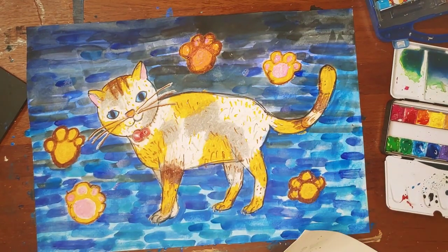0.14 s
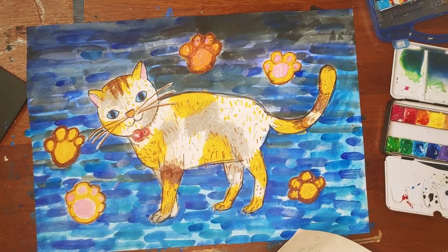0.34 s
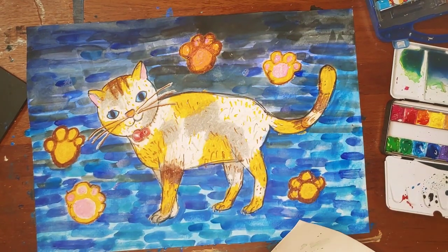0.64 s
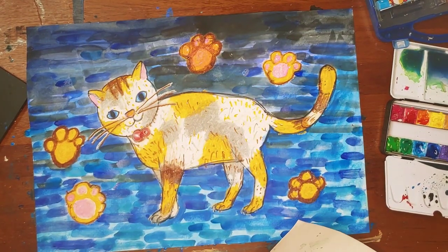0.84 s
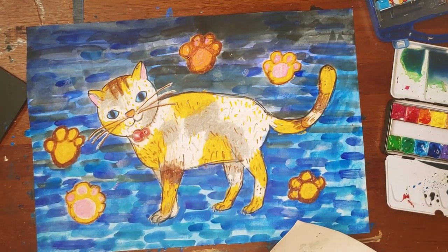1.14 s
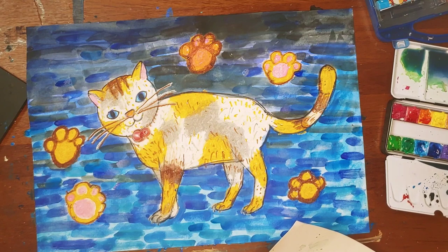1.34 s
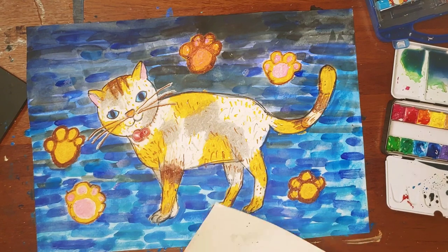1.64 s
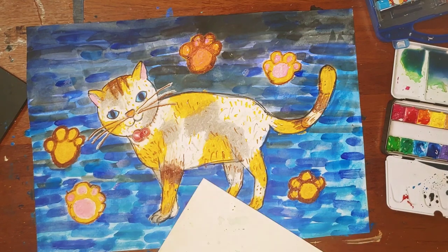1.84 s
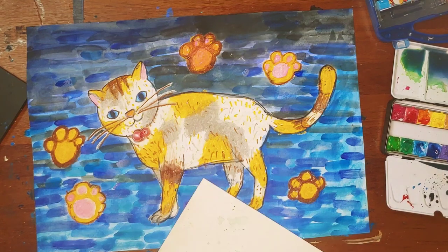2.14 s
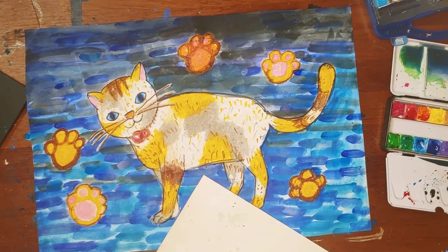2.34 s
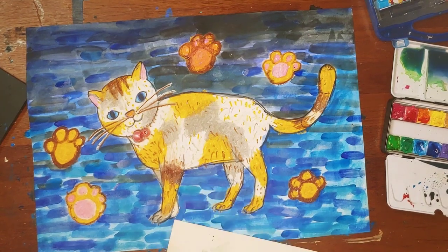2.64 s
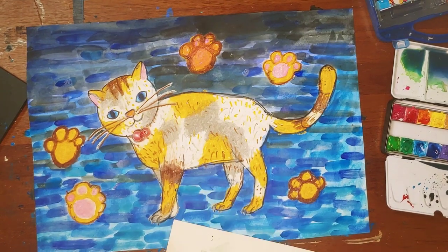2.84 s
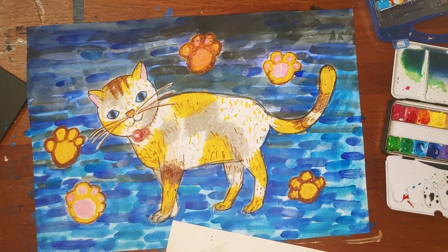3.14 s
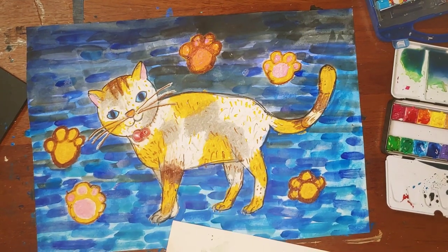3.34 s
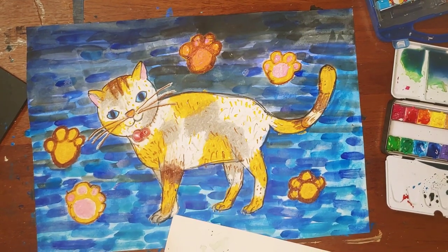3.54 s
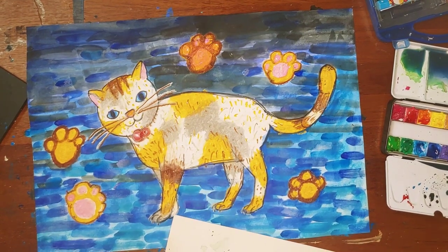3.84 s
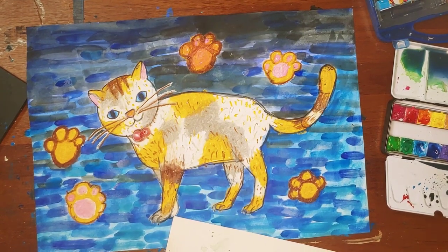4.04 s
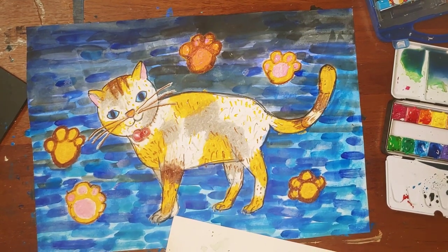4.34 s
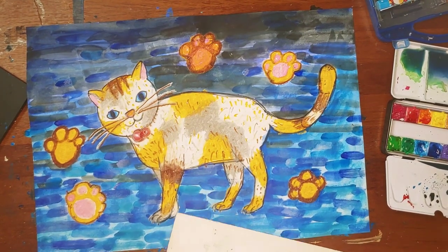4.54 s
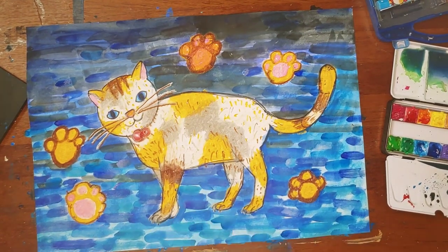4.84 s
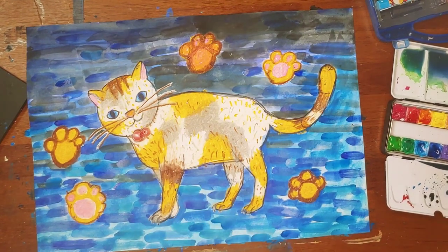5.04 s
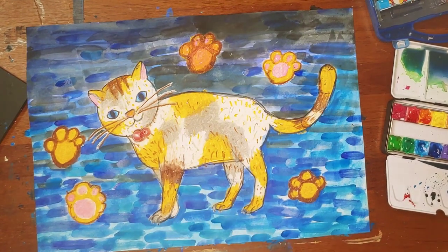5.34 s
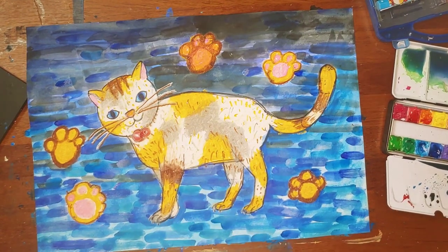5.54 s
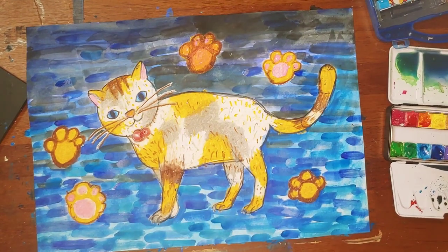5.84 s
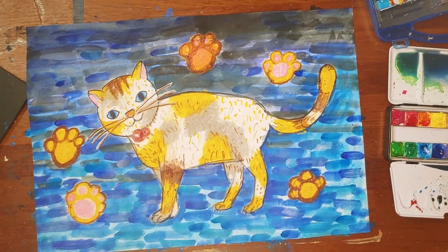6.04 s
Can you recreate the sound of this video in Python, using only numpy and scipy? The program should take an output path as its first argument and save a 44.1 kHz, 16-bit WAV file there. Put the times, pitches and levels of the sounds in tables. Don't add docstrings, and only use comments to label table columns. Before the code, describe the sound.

Close stereo microphones on a desk stand, in a quiet room with low hum and very faint hiss. At 0 s a low bump and bright, dry paper scuffs start, hissing in quick bursts until about 0.3 s, with soft low bumps continuing to 0.8 s. Near 1.1 s a light edge slap and tick; from 1.4 to 2.1 s short dull rubs, woody taps, muffled thumps and squeaky hisses. At 2.3 s one hard, hollow knock on wood, far louder than the rest, with an immediate slap and another thump and tap. At 2.5-2.8 s a soft pop, crease ticks, taps and scuffs. Around 3.3 s a slower pop, then small rubs and flicks to 3.7 s. At 4.05 s a firm woody slap, a shorter one at 4.4 s, a soft thump at 4.55 s. Sparse ticks and faint taps follow, ending with a dull slap at 5.7 s and room tone.

```python
import sys
import numpy as np
from scipy import signal
from scipy.io import wavfile
from scipy.ndimage import uniform_filter1d

SR = 44100
rng = np.random.default_rng(int(sys.argv[2]) if len(sys.argv) > 2 else 0)


def magnitude_from_level(level_db):
    exponent = np.asarray(level_db, float) / 20
    return 10 ** exponent


def transcribe(signal):
    frames = np.atleast_2d(signal).T
    limited = np.clip(frames, -1, 1)
    pcm = np.round(limited * 32767).astype(np.int16)
    wavfile.write(sys.argv[1], SR, pcm)


N = 272979


def rms_one(x):
    return x / np.sqrt(np.mean(x ** 2) + 1e-20)


def at_hz(points, hz):
    table_hz, value = np.array(points).T[:2]
    return np.interp(np.log(hz), np.log(table_hz), value)


def band(x, low_hz, high_hz, order=2):
    return signal.sosfilt(signal.butter(order, [low_hz, high_hz], "band", fs=SR, output="sos"), x)


def drift(rate_hz):
    r = np.exp(-40 * np.pi * rate_hz / SR)
    chance = rng.standard_normal(N // 20 + 2002)
    slow = signal.lfilter([1], [1, -2 * r, r * r], chance)[2000:]
    return np.interp(np.arange(N) / 20, np.arange(len(slow)), rms_one(slow))


def ring(force, hz, t60_s):
    r = magnitude_from_level(-60 / (t60_s * SR))
    w = 2 * np.pi * hz / SR
    return signal.lfilter([0, np.sin(w)], [1, -2 * r * np.cos(w), r * r], force + 1e-18)


def two_ports(mid, side, alike):
    alike = np.clip(alike, -.95, .999)
    return np.sqrt(1 + alike) * mid + np.sqrt(1 - alike) * side * [[1], [-1]]


# pitch_hz, density_db (per Hz)
ROOM_SPECTRUM = [(18, -32), (32, -2), (52, -1.5), (82, -8), (158, -3), (287, -12), (358, -13), (736, -15),
                 (2040, -30.5), (3690, -34), (4280, -38.5), (4970, -38.5), (6690, -42.5), (7390, -49),
                 (9470, -28), (11300, -48.5), (14700, -80), (22000, -120)]
# pitch_hz, likeness (-1 to 1)
PORT_LIKENESS = [(60, 0.9), (130, 0.88), (260, 0.82), (560, 0.49), (1170, -0.085), (2450, -0.2),
                 (5150, 0.03), (10800, -0.089)]


def room_tone():
    out = 0
    together = drift(2.5)
    edges_hz = 28 * 2 ** np.arange(0, 9.4, .4)
    white = rng.standard_normal((2, 2, N))
    for k, (low, high) in enumerate(zip(edges_hz, edges_hz[1:])):
        hz = np.sqrt(low * high)
        pair = band(white[k % 2], low, high)
        level_db = at_hz(ROOM_SPECTRUM, hz) + .6 * together + .8 * drift(9)
        out = out + magnitude_from_level(level_db) * two_ports(*pair, at_hz(PORT_LIKENESS, hz))
    return magnitude_from_level(-63.5) * rms_one(out)


# middle_s, level_db, length_s
STAND_BUMPS = [(-0.019, -31.5, 0.069), (0.098, -55, 0.18), (0.197, -56.5, 0.12), (0.299, -53, 0.12),
               (0.421, -56.5, 0.063), (0.498, -48, 0.09), (0.653, -58.5, 0.079), (0.757, -59, 0.075),
               (1.136, -62, 0.06), (1.23, -70, 0.053), (1.567, -63, 0.062), (1.718, -70, 0.31),
               (1.945, -69, 0.11), (2.176, -64.5, 0.13), (2.58, -60, 0.31), (3.04, -72, 0.11),
               (3.47, -59.5, 0.067), (3.819, -67.5, 0.11), (4.432, -75, 0.35), (5.142, -64.5, 0.077),
               (5.417, -67, 0.065), (5.517, -77, 0.043), (5.79, -61, 0.091), (6.01, -78, 0.088)]


def bumps():
    time = np.arange(N) / SR
    level = magnitude_from_level(-73.5)
    for middle_s, db, length_s in STAND_BUMPS:
        swell = np.cos(np.pi * np.clip((time - middle_s) / length_s, -.5, .5)) ** 2
        level = level + magnitude_from_level(db) * swell
    shake = band(rng.standard_normal((2, N)), 42, 85)
    shake = shake / uniform_filter1d(np.abs(shake[0]), size=1300)
    return level * rms_one(two_ports(*shake, 0.99))


# start_s, peak_db, pulse_ms, crack_db
SHEET_POPS = [
    (2.5262, -41, 1.8, -13),
    (3.3340, -38, 2.8, -17),
]


def pops():
    out, size = np.zeros((2, N)), 1500
    for s, db, pulse_ms, crack_db in SHEET_POPS:
        age = np.arange(size) / SR / (pulse_ms / 1000) - .5
        crack = rng.standard_normal((2, size)) * np.exp(-np.clip(age, 0, 50) / .5) * (age > 0)
        crack = magnitude_from_level(crack_db) * signal.lfilter([.5], [1, -1.2, .36], crack)
        air = -(age + .07) * np.exp(-(age / .3) ** 2) * 8
        i = int(s * SR)
        out[:, i:i + size] += magnitude_from_level(db - 2) * (air + crack)
    return out


# start_s, peak_db, pitch_hz, t60_ms
CREASE_TICKS = [(1.135, -52.5, 4100, 7.3), (1.4548, -59, 1090, 27), (1.455, -51, 830, 40),
                (1.68, -54, 793, 69), (1.681, -44, 198, 70), (1.824, -52, 220, 64), (1.826, -49, 337, 50),
                (1.838, -55, 1400, 17), (2.4992, -59, 600, 12), (2.525, -51, 1346, 29),
                (2.561, -48.5, 640, 19), (2.564, -52, 205, 60), (2.569, -57, 940, 25),
                (2.577, -42.5, 697, 29), (2.95, -58.5, 2700, 15), (2.962, -64, 1834, 66),
                (2.986, -65, 3330, 13), (3.135, -68.5, 6720, 20), (3.135, -70, 9700, 15),
                (3.1795, -64.5, 3190, 7.1), (3.334, -50, 2010, 0.65), (3.684, -56, 1205, 38),
                (4.056, -57, 900, 25), (4.057, -54, 3600, 15), (4.058, -66, 4450, 15), (4.06, -59, 149, 80),
                (4.062, -54, 1190, 22), (4.065, -64, 3350, 25), (4.154, -74, 2530, 8.1),
                (4.2458, -70, 1400, 14), (4.387, -67, 2639, 3.8), (4.579, -68, 4270, 24),
                (4.8566, -69, 3190, 14), (5.05, -62.5, 3270, 13), (5.051, -66, 3780, 15),
                (5.053, -76, 6730, 49), (5.128, -78, 6600, 40), (5.4295, -62, 870, 15),
                (5.7, -62, 1370, 34), (5.699, -54, 540, 47), (5.701, -68, 3100, 22), (5.702, -72, 1970, 20),
                (5.702, -79, 4300, 50), (5.705, -61, 920, 36), (5.711, -53, 1500, 30)]


def ticks():
    out, size = np.zeros((2, N + SR)), 3000
    age = np.arange(size) / SR
    for s, db, hz, t60_ms in CREASE_TICKS:
        chance = rng.standard_normal((2, size))
        note = ring(chance * np.exp(-age / .004), hz, t60_ms / 1000)
        note = note / np.abs(note).max(axis=1, keepdims=True)
        click = magnitude_from_level(-13) * signal.lfilter([.35], [1, -1.5, .5625], chance * np.exp(-age / .001))
        i = int(s * SR)
        out[:, i:i + size] += magnitude_from_level(db) * two_ports(*(note + click), at_hz(PORT_LIKENESS, hz))
    return out[:, :N]


# start_s, peak_db, pitch_hz, contact_ms, snap_db
WOOD_TAPS = [(0.011, -53, 287, 14, -42), (0.269, -56.5, 414, 38, -12), (1.137, -54, 315, 5.4, -35),
             (1.452, -48, 378, 19, -36), (1.682, -42.5, 528, 20.2, -40), (1.825, -58, 330, 25, -4.5),
             (1.964, -53, 514, 17, -30), (2.3545, -31.5, 326, 8.9, -38), (2.498, -53.5, 467, 15, -22),
             (2.525, -45.5, 485, 9.7, -8.5), (2.56, -40, 440, 9, -37), (2.568, -36, 349, 14, -21),
             (2.654, -46, 494, 20, -37), (3.179, -63, 507, 17, -18), (3.315, -65, 298, 12, -26),
             (3.378, -49, 523, 16, -34), (3.563, -55, 478, 13, -15), (3.615, -53.5, 490, 7.9, -22),
             (4.052, -36, 501, 9.9, -43), (4.066, -46.5, 478, 12.4, -32), (5.31, -57, 390, 18, -30),
             (5.43, -58.5, 412, 6.5, -24), (5.7, -52, 334, 16, -44), (5.706, -51.5, 665, 7.2, -51)]


def taps():
    out, size = np.zeros((2, N + SR)), 4000
    age = np.arange(size) / SR
    for s, db, hz, contact_ms, snap_db in WOOD_TAPS:
        chance = rng.standard_normal((4, size))
        pan_db = -rng.uniform(-0.74, 1)
        contact_s = contact_ms / 1000
        force = 0.019 * chance[:2] * (age < contact_s)
        force[0, 0] = -1
        note = ring(force, hz, 95.0 / hz) + 1.8 * ring(force, hz * 1.18, 11.8 / hz)
        note = note + 0.086 * ring(force, hz * 2.3, 20.0 / hz) + 0.049 * ring(force, hz * 2.4, 42.0 / hz)
        note = note * np.minimum(age / 0.0053, 1) * np.exp(-np.maximum(age - contact_s, 0) / 0.0051)
        note = two_ports(*signal.lfilter([.3], [1, -.7], note), 0.57)
        snap = 0
        for mode_hz, width_hz, mode_db in SCRAPE_PEAKS[1:] + BRIGHT_PEAKS:
            snap = snap + magnitude_from_level(mode_db) * rms_one(ring(chance[2:], mode_hz, 6.9 / np.pi / width_hz))
        snap = magnitude_from_level(snap_db - 14.5) * snap * (np.exp(-age / 0.0068) + 0.235 * np.exp(-age / 0.011))
        tap = note / np.abs(note).max() + two_ports(*snap, -0.26)
        i = int(s * SR)
        out[:, i:i + size] += magnitude_from_level(db) * tap * magnitude_from_level(np.array([[pan_db], [-pan_db]]) / 2)
    return out[:, :N]


# start_s, peak_db, contact_ms, damped_after_ms
HAND_THUMPS = [(0.283, -52, 5.1, 27), (0.705, -54, 3.2, 49), (1.007, -59, 6.8, 10), (1.444, -47, 5.3, 31),
               (1.575, -53.5, 2.4, 35), (1.676, -41, 4, 58), (1.823, -44, 4, 22), (2.3435, -38, 4.2, 20),
               (2.3505, -29, 4.3, 27), (2.563, -42, 3, 40), (2.656, -41.5, 5.6, 82), (3.034, -58, 8.1, 17),
               (3.316, -50.5, 3.4, 37), (3.381, -50.5, 4.6, 42), (3.556, -58, 4, 26), (4.561, -45, 7.3, 42),
               (5.348, -51.5, 5.9, 11), (5.624, -46.5, 7.3, 51)]
# start_s, peak_db, contact_ms, damped_after_ms
KNOCK = [
    (2.2918, -12.3, 3.1, 36),
]
# pitch_hz, level_db, t60_s
DESK_MODES = [(82.5, -29.5, .1), (155.4, 0, .063), (220.7, -21, .105), (315, -15, .068)]
# pitch_hz, level_db, t60_s
STAND_MODES = [(149.4, 1.07, .054), (445, -13.5, .015)]
# pitch_hz, level_db, t60_s
PANEL_MODES = [(494, -29.5, 0.028), (715, -47.5, 0.11), (1016, -44, 0.088), (1257, -51, 0.051),
               (1920, -46, 0.04), (2780, -55, 0.08), (3800, -47.5, 0.03), (5400, -56, 0.034),
               (6570, -49, .03)]


def thumps():
    out, size = np.zeros(N + SR), 6000
    age = np.arange(size) / SR

    def modes(force, table):
        return sum(magnitude_from_level(db) * ring(force, hz, t60_s) for hz, db, t60_s in table)

    for s, db, contact_ms, damped_ms in HAND_THUMPS + KNOCK:
        push = np.hanning(max(3, int(abs(contact_ms) * SR / 1000)))
        force = np.pad(push / push.sum(), (0, size - len(push)))
        body = modes(force, STAND_MODES) - modes(force, DESK_MODES)
        body = body * np.minimum(age / .004, 1)
        edge = np.pad(np.hanning(10) / 5, (40, size - 50)) * min(3.1 / contact_ms, 1) ** 5
        body = body + modes(edge, PANEL_MODES)
        body = body * np.exp(-np.maximum(age - damped_ms / 1000, 0) / .012)
        i = int(s * SR)
        out[i:i + size] += magnitude_from_level(db) * body / np.abs(body).max()
    return out[:N]


def desk_at_ports(desk):
    later = np.pad(desk, (9, 0))[:N]
    sway = magnitude_from_level(-8.0) * band(desk, 45, 105) * [[1], [-1]]
    return np.array([magnitude_from_level(0.1) * later, magnitude_from_level(-0.7) * desk]) + sway


def friction(per_s, spread_db, grain_share):
    caught = rng.random((2, N)) < per_s / SR
    sizes = magnitude_from_level(spread_db * np.minimum(rng.exponential(1, N), 5)) * rng.standard_normal((2, N))
    return rng.standard_normal((2, N)) + grain_share * rms_one(caught * sizes)


def resonant(pair, peaks, alike):
    out = 0
    for k, (hz, width_hz, db) in enumerate(peaks):
        r = np.exp(-np.pi * width_hz / SR)
        poles = [1, -2 * r * np.cos(2 * np.pi * hz / SR), r * r]
        peak = signal.lfilter([(1 - r * r) / 2, 0, (r * r - 1) / 2], poles, pair)
        out = out + magnitude_from_level(db + 1.6 * drift(22)) * (-1) ** k * peak
    return rms_one(two_ports(*out, alike))


def ridge(s, hz, width_hz, alike):
    phase = 2 * np.pi * np.cumsum(np.interp(np.arange(N) / SR, s, hz)) / SR
    lowpass = signal.butter(2, width_hz / 2, fs=SR, output="sos")
    slow = signal.sosfilt(lowpass, rng.standard_normal((2, 2, N)))
    return rms_one(two_ports(*(slow[0] * np.cos(phase) + slow[1] * np.sin(phase)), alike))


# start_s, length_s, end_scrape_db, bright_share_db, rub_share_db
PAPER_SLIDES = [(0.006, 0.057, -59.5, 2, 3.5), (0.105, 0.063, -56.5, 3, -4.5), (0.265, 0.064, -64, 1.5, 3),
                (1.497, 0.11, -67.5, -11, 11), (1.639, 0.081, -67, -10, 5.5), (1.811, 0.032, -63, -3, 4),
                (1.952, 0.086, -59.5, -8, -2), (2.05, 0.023, -54, 3, -1.5), (2.515, 0.11, -67.5, 1, 6),
                (2.635, 0.13, -80, 5, 1), (2.648, 0.031, -72.5, -11, 20), (2.725, 0.083, -59.5, 0.5, -2.5),
                (2.801, 0.06, -76, -1.5, 8), (2.968, 0.042, -82, -3, 17), (3.478, 0.035, -80.5, -2, 9),
                (3.13, 0.038, -78, 0, 8.5), (3.344, 0.038, -74, -6, 6), (3.378, 0.036, -67, 0.5, 5.5),
                (3.444, 0.028, -61, -1, 2.5), (3.604, 0.018, -69, 1, 12), (3.641, 0.054, -67.5, 3.5, 12),
                (4.396, 0.018, -67.5, 2.5, 10.5), (3.985, 0.017, -72.5, -3.5, 10.5),
                (5.012, 0.02, -84.5, 7.5, -2), (4.564, 0.02, -72.5, 2.5, 8),
                (0.072, 0.046, -64.5, -1.5, -6)]
# peak_s, scrape_db, bright_share_db, rub_share_db, fade_ms (per 20 dB)
EDGE_FLICKS = [(0.28, -64.5, 13, 8, 5), (0.558, -72.5, -2, 12, 3), (1.036, -80, -2, 0, 29),
               (1.579, -65, -10, 8.5, 66), (1.69, -69, -13, -12, 32), (1.972, -62, 7, 9, 23),
               (2.322, -65.5, -14.5, 8.5, 38), (2.366, -65, -9, 16, 34.5), (2.807, -59, -3.5, -28, 36),
               (2.944, -69.5, -2, 11.5, 30), (3.272, -70.5, -12, 5, 28), (3.32, -64.5, -5, 7, 30),
               (3.572, -69.5, -5, 5, 33), (3.664, -52, -12, -10, 13), (1.535, -71, -12, 13, 30),
               (3.412, -68, 4, -22, 68), (0.191, -45, -1, -4.5, 12.5)]
# peak_s, scrape_db, bright_share_db, rub_share_db, fade_ms (per 20 dB)
EDGE_SLAPS = [
    (1.136, -59, -6.5, 1, 23),
    (2.2935, -52, -13.5, 14, 40.2),
    (4.054, -54, -9, 7.5, 39.7),
    (4.3845, -56, -10, -0.5, 24.8),
    (5.699, -76.5, -25, 22.5, 120),
]


def stroke_shapes(time):
    lift_db_per_s = 1500
    for s, length_s, db, bright_db, rub_db in PAPER_SLIDES:
        age = time - s
        since = np.maximum(age - length_s, 0)
        grip = np.clip(age / .02 + 0.59, 0, 1) ** 2
        swell_db = db - 3.0 * (1 - np.clip(age / length_s, 0, 1))
        lift = magnitude_from_level(-lift_db_per_s * since) + magnitude_from_level(-23 - 276 * since)
        yield grip * magnitude_from_level(swell_db) * lift, bright_db, rub_db
    # rows, rise in dB per s, time in s until the sheet lies flat and silent
    for rows, rise, rest_s in [(EDGE_FLICKS, 1798.5, 1), (EDGE_SLAPS, 9000, 0.023)]:
        for s, db, bright_db, rub_db, fade_ms in rows:
            age = time - s
            shape_db = np.minimum(rise * age, -20 * age / (fade_ms / 1000))
            rest_db = -2 * lift_db_per_s * np.maximum(age - rest_s, 0)
            yield magnitude_from_level(db + shape_db + rest_db), bright_db, rub_db


# pitch_hz, width_hz, level_db
SCRAPE_PEAKS = [(2440, 1600, 0.5), (2925, 910, 7), (3570, 430, 5.5), (4000, 1040, -2)]
# pitch_hz, width_hz, level_db
BRIGHT_PEAKS = [(5220, 1100, -9), (6310, 380, -3), (6720, 210, -3.5), (8050, 710, -8.5), (9620, 420, -10.5),
                (10150, 1100, -19), (13500, 1900, -31.5)]
# pitch_hz, width_hz, level_db
RUB_PEAKS = [(476, 274, 2.5), (944, 237, 5), (1237, 170, 3), (1700, 550, -5)]
# time_s, lower_hz, upper_hz, squeak_db, sheen_db (top treble)
BEND_RIDGES = [(0.0, 2955, 6150, -16, 5), (0.16, 3040, 6020, -7, 7.5), (0.358, 3130, 5830, 0, 6),
               (1.149, 3150, 5870, 2, -4), (1.601, 2950, 5720, -18, -3), (1.94, 2772, 5960, -2.5, 1),
               (2.04, 3000, 5980, 4.5, 2), (2.109, 3100, 6430, -13, -1.5), (2.549, 3200, 5570, -4, 1),
               (2.629, 2970, 5660, 3.5, -3), (2.72, 2786, 5620, -5, -0.5), (2.791, 2900, 6310, 1, 9.5),
               (2.84, 3150, 6340, -7, -3), (3.39, 3000, 5965, -13, 3.5), (3.599, 2957, 5450, -4, 2),
               (3.69, 3000, 5620, -6, 3), (4.05, 3250, 6090, -1, 3), (4.431, 3040, 5620, -13, 1)]


def strokes():
    time = np.arange(N) / SR
    coarse = time[::16]
    gains = 0
    for level, bright_db, rub_db in stroke_shapes(coarse):
        gains = gains + level * magnitude_from_level(np.array([[0], [bright_db], [rub_db]]))
    scrape_gain, bright_gain, rub_gain = [np.interp(time, coarse, g) for g in gains]

    bend_s, lower_hz, upper_hz, squeak_db, sheen_db = np.transpose(BEND_RIDGES)
    squeak = magnitude_from_level(np.interp(time, bend_s, squeak_db) + 0.67 * drift(41))
    sheen = magnitude_from_level(np.interp(time, bend_s, sheen_db))
    stutter = drift(60)

    scrape = resonant(friction(4000, 2.6, 0.5), SCRAPE_PEAKS, 0.1)
    scrape = .65 * scrape + squeak * ridge(bend_s, lower_hz, 270, -.45)
    scrape = magnitude_from_level(1.2 * stutter + 1.1 * drift(90)) * scrape

    bright = resonant(friction(3000, 3.0, 0.34), BRIGHT_PEAKS, -0.037)
    top = signal.sosfilt(signal.butter(3, 7400, "high", fs=SR, output="sos"), bright)
    bright = bright + (sheen - 1) * top
    bright = .85 * bright + .7 * squeak * ridge(bend_s, upper_hz, 450, -.1)
    bright = magnitude_from_level(1.0 * stutter + 1.2 * drift(90)) * bright

    rub = resonant(friction(1200, 2.5, .4), RUB_PEAKS, .1)
    rub = magnitude_from_level(0.92 * stutter + 1.57 * drift(40) - 5.5) * rub
    return scrape_gain * scrape + bright_gain * bright + rub_gain * rub


def scene():
    background = room_tone() + bumps()
    touches = pops() + ticks() + taps() + desk_at_ports(thumps())
    return background + touches + strokes()


def top_cut(x):
    return signal.sosfilt(signal.butter(12, 15700, fs=SR, output="sos"), x)


def record(dry):
    dry = signal.sosfilt(signal.butter(2, 35, "high", fs=SR, output="sos"), dry)
    dip_hz, dip_width_hz, depth = 7630, 2080, 0.64
    notched = signal.lfilter(*signal.iirnotch(dip_hz, dip_hz / dip_width_hz, fs=SR), dry)
    dry = depth * notched + (1 - depth) * dry
    low = signal.sosfilt(signal.cheby2(10, 30, 11600, fs=SR, output="sos"), dry)
    stepped = low + 0.23 * (dry - low)
    hiss = magnitude_from_level(-99.5) * rms_one(band(rng.standard_normal(dry.shape), 10500, 15600, order=4))
    return top_cut(stepped + hiss)


dry = scene()
out = record(dry)
transcribe(out)
```